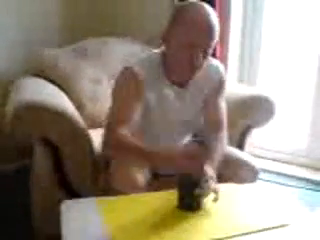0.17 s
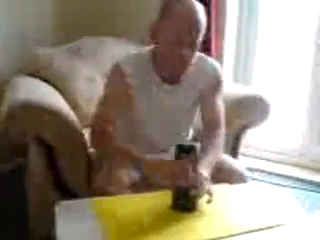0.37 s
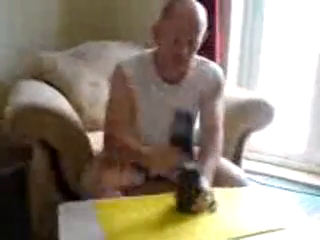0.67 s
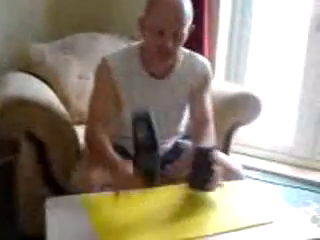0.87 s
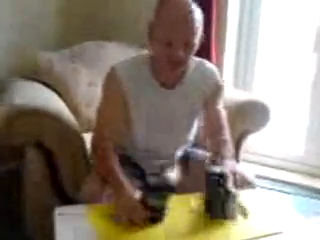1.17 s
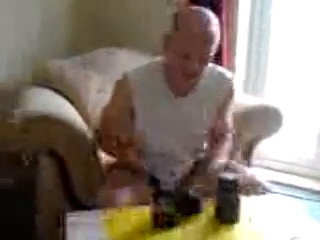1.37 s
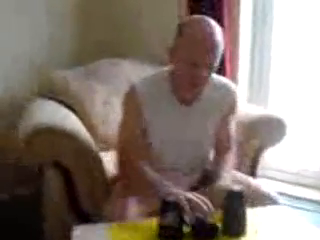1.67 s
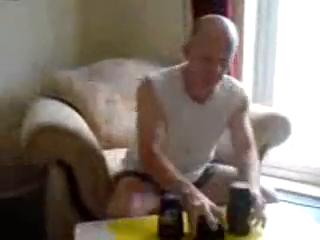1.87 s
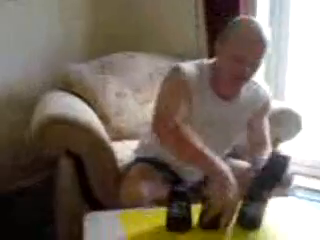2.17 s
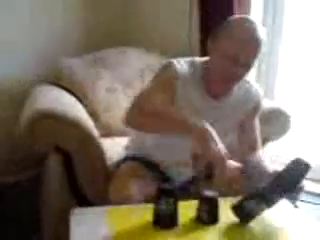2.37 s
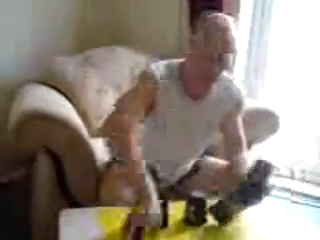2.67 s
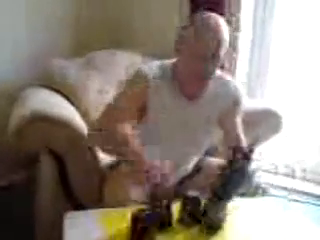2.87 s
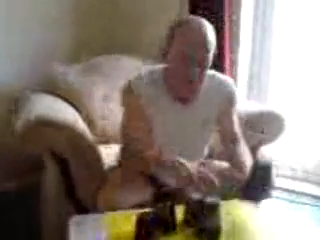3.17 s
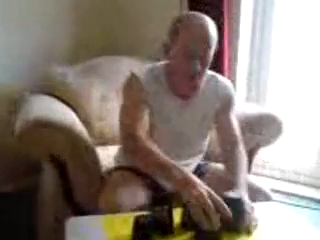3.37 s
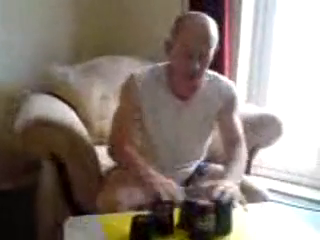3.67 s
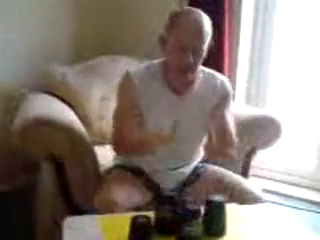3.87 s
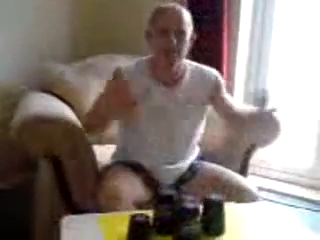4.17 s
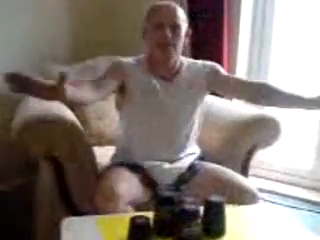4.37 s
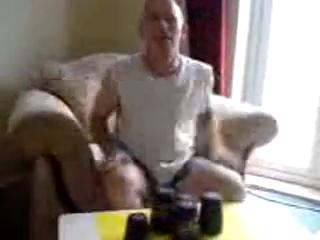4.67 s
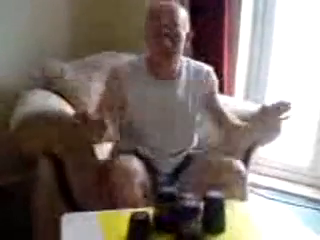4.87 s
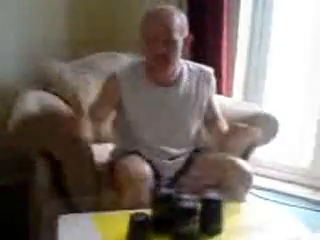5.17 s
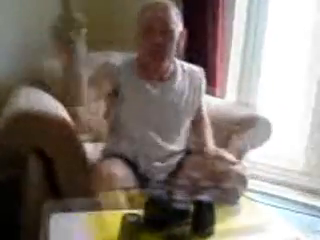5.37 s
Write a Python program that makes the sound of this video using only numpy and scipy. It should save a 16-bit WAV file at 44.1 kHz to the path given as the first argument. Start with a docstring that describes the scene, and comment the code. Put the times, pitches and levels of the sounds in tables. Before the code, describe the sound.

Rapid hollow plastic cup knocks and scrapes on a table in a soft living room, ending with two sharp slaps, muffled and overloaded.

```python
"""Light plastic cups are nested, pulled apart and set down on a low table in a soft living room.
Each knock is a short chatter of rims that rings the rims, the air in the cups and the cup walls.
Cups set down ring the table top, low thumps jolt it, and grainy noise slides between the knocks.
Hands slap twice near the end: bursts of noise coloured by the cupped palms.
Short echoes and a quiet room tone lie behind; a dull microphone overloads on the loudest peaks."""
import sys
import numpy as np
from scipy import signal
from scipy.io import wavfile
from scipy.ndimage import uniform_filter1d

SR = 44100
rng = np.random.default_rng(int(sys.argv[2]) if len(sys.argv) > 2 else 0)


def digitize_waveform(pressure):
    """Quantize a signal to 16-bit integers and store it at the path in sys.argv[1].

    Rows of a 2-D input are taken as channels; values are limited to [-1, 1].
    """
    field = np.atleast_2d(pressure).T
    bounded = np.clip(field, -1, 1)
    quanta = np.round(bounded * 32767).astype(np.int16)
    wavfile.write(sys.argv[1], SR, quanta)


def gain_from_db(level_db):
    """Turn a decibel level (scalar or array-like) into a linear amplitude factor."""
    decades = np.asarray(level_db, float) / 20
    return 10 ** decades


N = 242991  # length in samples

# Cups meeting. Each row: firm contact in seconds, relative level of the rim clack in dB,
# cup air in dB against the clack, cup wall in dB against the clack, brightest rim pitch in Hz,
# share of the energy in the first contact from 0 to 1.
CUP_KNOCKS = [(0.0486, -16.5, -30, -3, 1670, 0), (0.096, -15.5, 4.5, -7, 2910, 0.42),
              (0.144, -2, 1.5, -5, 1770, 0.14), (0.183, 1.5, -34.5, -1, 1620, 0.29),
              (0.2267, -28, -9, 14.5, 1620, 0.34), (0.4092, -10.5, -4.5, 0.5, 1505, 0),
              (0.4322, -11.5, -17, -1, 1360, 0.35), (0.6055, -8.5, 0.5, 1.5, 2600, 0),
              (0.7004, -19.5, 1.5, 4.5, 2130, 0.07), (0.728, -8.5, 11.5, 9, 1210, 0.26),
              (0.7547, -11.5, 7.5, -18.5, 1705, 0), (0.7991, -14.5, -7, -0.5, 2260, 0.27),
              (0.9416, -5.5, -3.5, -3, 2500, 0.6), (0.9748, -4.5, 7.5, -1, 1620, 0.39),
              (0.9934, -22, 10, -1.5, 1620, 0), (1.0953, -15.5, 0, -1, 2290, 0),
              (1.1239, -16.5, -7.5, -18.5, 2580, .05), (1.268, -19, -6.5, -18.5, 2860, 0.24),
              (1.5661, -24, -7, 16, 1730, .1), (1.592, 0, 3.5, -4.5, 1600, 0.32),
              (1.6864, 1.5, -3, -1.5, 1990, 0.11), (1.8769, 3.5, -6.5, -11.5, 1680, 0.06),
              (1.9186, -13, 4, 9, 1780, 0), (2.1185, -14, -8, -0.5, 1720, 1),
              (2.5133, -10.5, -4, -10, 2010, 0), (2.5333, -18, 15, 10.5, 1270, 0.04),
              (2.7311, -6.5, 5, 5, 1430, 0), (2.7508, -5, -2.5, 5, 1745, 0.7),
              (2.7783, -4.5, -14, -13.5, 1360, 0.4), (2.7975, -2, -8, -13.5, 2300, 0),
              (2.807, -5.5, 3.5, -9.5, 1720, 0.87), (2.958, -1, -8.5, -4, 2700, 0.17),
              (3.302, -1.5, -10.5, 5, 1740, 0.07), (3.467, -8, -4.5, -2.5, 2290, 0),
              (3.563, 0.5, -5, -8, 2210, 0.31), (3.6113, -11, 9, 2.5, 1840, 0.27),
              (3.857, -1.5, -3, 6, 2164, 0.13), (3.8982, -2, -5.5, -15, 2300, 0.44),
              (3.9934, -12, 11, 2, 1890, 0.29), (4.001, -5, -16.5, -9.5, 2220, 0.27),
              (4.031, -14.5, -1.5, -7, 1350, 0.14), (4.2813, -12, -0.5, -12, 1427, 0),
              (4.3033, -3, 8.5, -4, 2477, 0.3), (4.356, -12, 10, 5.5, 1606, .05),
              (4.381, -9.5, -17, -13.5, 1800, 0.37), (4.43, -7, -4, -1.5, 1780, 0)]
# Ringing tones of each part. Each row: usual pitch in Hz, relative level in dB,
# time to fade by 60 dB in seconds.
TABLE_TOP_MODES = [(117, -25, 0.033), (179.5, -2, 0.46), (225, 3, 0.057), (254.2, 1, 0.39),
                   (319.3, 2, 0.29)]
CUP_AIR_MODES = [(458, 0, .045), (515, -1, .035)]
CUP_WALL_MODES = [(653, 10, 0.0071), (799.6, 3.8, 0.05), (920.4, 5.3, 0.052), (1008, 7.2, 0.031)]
RIM_MODES = [(1266, 13, 0.0058), (1620, 4, 0.009), (1870, 1, 0.0076), (2300, 2.5, 0.0058),
             (2590, -0.5, 0.0094), (3136, -4.5, 0.03), (3850, -1, 0.018), (4260, 3, 0.0061)]
# Cups coming down on the table top. Each row: firm contact in seconds, relative level in dB.
CUP_LANDINGS = [(0.0431, -18.5), (0.1432, -12.5), (0.1818, -5), (0.411, -14.5), (0.6072, -14.5),
                (0.6476, -38), (0.6967, -13.5), (0.7528, -12.5), (0.8012, -10.5), (0.943, -14),
                (1.0965, -14), (1.1266, -20), (1.5917, -9), (1.6828, -9.5), (1.8754, -3.5), (2.5149, -14),
                (4.0323, -12.5), (4.2819, -8.5), (4.357, -27), (4.4302, -13)]
# The table legs jolt. Each row: start in seconds, relative level in dB, pitch in Hz.
TABLE_THUMPS = [(0.143, -15, 181), (0.727, -14.5, 177), (1.682, -24.5, 182), (2.514, -19, 167),
                (4.28, -18.5, 129.7), (5.199, -35.5, 104)]
# Bursts of the hand slaps. Each row: start in seconds, relative level in dB,
# pitch of the cupped air in Hz, fading time (to 1/e) in milliseconds.
HAND_SLAPS = [(4.567, 10, 1410, 7.5), (4.569, 1, 2550, 6.1), (5.199, 6.5, 2390, 8), (5.211, 5.5, 3060, 4.8)]
# Colour of a slap before the palm. Each row: frequency in Hz, level in dB per Hz.
SLAP_COLOUR = [(100, -21.5), (500, -7.5), (1200, -8), (2500, -2), (5000, 0)]
# Cups and hands sliding on the mat and in each other. Each row: middle in seconds, level in dB,
# nominal length in seconds, pitch of the hollow or wall that sounds in Hz.
SLIDE_STROKES = [(0.029, -39, 0.14, 485), (0.108, -22.5, 0.044, 2930), (0.324, -40.5, 0.25, 306),
                 (0.419, -37.5, 0.1, 1370), (0.68, -28.5, 0.15, 2990), (0.872, -32.5, 0.15, 288),
                 (0.95, -15, 0.027, 2900), (1.092, -39, 0.18, 2830), (1.118, -29.5, 0.11, 363),
                 (1.178, -29.5, 0.036, 3030), (1.345, -37, 0.22, 2530), (1.432, -42.5, 0.074, 584),
                 (1.481, -37.5, 0.065, 2900), (1.528, -39, 0.061, 900), (1.847, -24.5, 0.12, 427),
                 (2.038, -33, 0.2, 285), (2.09, -31.5, 0.063, 1670), (2.193, -28.5, 0.07, 2430),
                 (2.207, -38, 0.17, 356), (2.237, -33, 0.085, 2150), (2.341, -31, 0.031, 2100),
                 (2.483, -31.5, 0.13, 280), (2.501, -31, 0.08, 2090), (2.629, -32, 0.2, 3130),
                 (2.928, -35.5, 0.18, 2900), (3.131, -28.5, .045, 620), (3.26, -44.5, .04, 1700),
                 (3.852, -11.5, 0.018, 1425), (4.151, -28, 0.067, 1470), (4.156, -21, 0.096, 406),
                 (5.146, -28.5, 0.04, 1980), (5.19, -20.5, 0.017, 2130), (5.315, -47, 0.31, 375),
                 (5.486, -46, 0.1, 2480)]
# How fast the echoes die. Each row: frequency in Hz, time to fade by 60 dB in seconds.
ROOM_FADE = [(100, 0.5), (300, 0.21), (800, 0.32), (1450, 0.25), (2500, 0.24), (4500, 0.29)]
# Colour of the room tone. Each row: frequency in Hz, relative level in dB per Hz.
HUSH_COLOUR = [(24, -37), (40, -13.5), (252, -4), (424, -19.5), (560, -14), (3400, -20.5), (4420, -46)]
# Response of the microphone. Each row: frequency in Hz, gain in dB.
MIC_RESPONSE = [(40, -3), (100, 1), (2500, -1.5), (3200, -3.5), (3500, -7), (3800, -19.5), (4300, -25),
                (4800, -15.5), (5200, -73.5)]

RATTLE_MS, RATTLE_GROWTH = 12.8, 0.53  # fading time at 0 dB; hard blows rattle the nested cups longer
GRAZE_MS, GRAZE_SHRINK = 1.03, 0.36  # rise time at 0 dB; soft blows take longer to seat
LEAD_MS, LEAD_DB = 5.1, -14  # a faint noise swells up just before each blow; level against the blow
LANDING_FIRM = 0.13  # first contact's share of a landing's energy
FREE_DB, FREE_T60 = 4.5, 0.0091  # the rim between the fingers: relative level, 60 dB fade in seconds
SCRAPE_WIDTH_HZ, SCRAPE_WIDTH_SHARE = 110, 0.33  # a scrape's band widens with its pitch
ROOM_DB, HUSH_DB = 1, -55  # echoes against the near sound; middle level of the room tone
CEILING_DB, KNEE = -0.45, 45  # overload level; a higher knee bends more sharply
SMEAR_DB, SMEAR_T60 = -6, 0.075  # treble noise after clipped peaks: level, 60 dB fade in seconds
EDGE_HZ = 10300  # upper band limit


def evened(x):
    """Scales a sound to an average (rms) level of 1."""
    return x / np.sqrt(np.mean(x ** 2) + 1e-20)


def read(points, hz):
    """Reads a table between its rows on a log-frequency axis."""
    f, value = np.transpose(points)
    return np.interp(np.log(hz + 1), np.log(f + 1), value)


def add(mix, s, sound):
    """Mixes a sound in at s seconds."""
    part = mix[round(s * SR):][:len(sound)]
    part += sound[:len(part)]


def coloured(x, points):
    """Filters by a table of Hz and dB, without sounding ahead of the input (minimum phase)."""
    hz = abs(np.fft.fftfreq(8192, 1 / SR))
    log_gain = np.log(gain_from_db(read(points, hz)))
    response = np.exp(np.conj(signal.hilbert(log_gain)))
    taps = np.fft.ifft(response).real[:2048]
    return signal.oaconvolve(x, taps)[:len(x)]


def resonate(x, hz, width):
    """One resonance with a gain of about 1 at its pitch; a wider one dies faster."""
    r = np.exp(-np.pi * width / SR)
    turn = np.exp(2j * np.pi * hz / SR)
    return 2 * signal.lfilter([1 - r], [1, -r * turn], x).real


def ring(modes, chance, spread_db, detune):
    """A part's response to one blow; where it lands shifts each mode's strength and pitch."""
    t = np.arange(SR // 4) / SR
    out = np.zeros(len(t))
    for (hz, db, t60), (strength, pitch) in zip(modes, chance):
        fade = gain_from_db(db + spread_db * strength - 60 * t / t60)
        out += fade * np.sin(2 * np.pi * hz * (1 + detune * pitch) * t)
    # little radiates below the lowest mode
    out = signal.lfilter(*signal.butter(2, 0.47 * modes[0][0], "high", fs=SR), out)
    return out / np.linalg.norm(out)


def chatter(noise, ms, rise_ms, grain_db):
    """A rising and dying flurry of uneven contacts, with a total energy of 1."""
    t_ms = np.arange(len(noise)) / SR * 1000
    # contacts bunch into bounces
    clumps = gain_from_db(3.6 * evened(uniform_filter1d(noise[::-1], 160)))
    shape = clumps * np.exp(-t_ms / max(ms, 0.5)) * np.minimum(t_ms / rise_ms, 1) ** 2
    contacts = np.sign(noise) * gain_from_db(grain_db * noise ** 2) * shape
    return contacts / np.linalg.norm(contacts)


def blow(db, firm):
    """A faint noise swells, a firm contact takes a share of the energy, a rattle the rest; gives lead too."""
    lead_noise, rattle = np.clip(rng.standard_normal((2, 4096)), -3.2, 3.2)
    firm = np.clip(firm, 0, 1)
    lead = round(LEAD_MS * SR / 1000)  # samples ahead of the firm contact
    rattle_ms = RATTLE_MS * gain_from_db(RATTLE_GROWTH * db)
    rise_ms = GRAZE_MS * gain_from_db(-GRAZE_SHRINK * db)
    drive = np.sqrt(1 - firm) * chatter(rattle, rattle_ms, rise_ms, grain_db=0.85)
    drive[0] += np.sqrt(firm)
    swell = gain_from_db(LEAD_DB) * lead_noise[:lead] * np.linspace(0, 1, lead) / np.sqrt(lead)
    return lead / SR, gain_from_db(db + 18.0) * np.concatenate([swell, drive])


def knocks():
    """Rims chatter into the three ringing parts of the cups: rims, enclosed air and walls."""
    out = np.zeros(N)
    for s, db, air_db, wall_db, bright_hz, firm in CUP_KNOCKS:
        lead, drive = blow(db, firm)
        # the grip leaves the rim modes near one pitch most free: 13 dB lost per octave away
        rim = [(hz, level_db - 13 * abs(np.log2(hz / bright_hz)), t60)
               for hz, level_db, t60 in RIM_MODES]
        # the stretch of rim between the fingers rings at the brightest pitch
        rim.append((bright_hz, FREE_DB, FREE_T60))
        body = np.zeros(SR // 4)
        for modes, level_db in ((rim, 0), (CUP_AIR_MODES, air_db), (CUP_WALL_MODES, wall_db)):
            chance = rng.standard_normal((len(modes), 2))
            body += gain_from_db(level_db) * ring(modes, chance, spread_db=2.5, detune=0.031)
        add(out, s - lead, signal.fftconvolve(drive, body))
    return out


def landings():
    """The table top rings under each cup set down, driven by the contacts of the blow."""
    out = np.zeros(N)
    for s, db in CUP_LANDINGS:
        lead, drive = blow(db, LANDING_FIRM)
        chance = rng.standard_normal((len(TABLE_TOP_MODES), 2))
        top = ring(TABLE_TOP_MODES, chance, spread_db=1.0, detune=0.0063)
        add(out, s - lead, signal.fftconvolve(drive, top))
    return out


def thumps():
    """The whole table swings at one low pitch, rising over 2.4 ms and fading 60 dB in 50 ms."""
    out = np.zeros(N)
    t = np.arange(SR // 4) / SR
    for s, db, hz in TABLE_THUMPS:
        fade = gain_from_db(db + 9.5 - 60 * t / 0.05)
        add(out, s, fade * np.sin(2 * np.pi * hz * t) * np.minimum(t / 0.0024, 1))
    return out


def slides():
    """Grainy friction swells and fades, sounding one hollow or wall."""
    out = np.zeros(N)
    for s, db, length, hz in SLIDE_STROKES:
        grip, friction = rng.standard_normal((2, SR // 2))
        grip = evened(uniform_filter1d(grip, 300))  # the contact catches and lets go
        # a few ridges snap past
        ticks = friction * gain_from_db(5.76 * grip + 1.5 * np.minimum(friction ** 2, 9))
        width = SCRAPE_WIDTH_HZ + SCRAPE_WIDTH_SHARE * hz
        sound = evened(resonate(resonate(ticks, hz, width), hz, 2 * width))
        swell = np.hanning(round(1.34 * length * SR))
        stroke = gain_from_db(db) * sound[:len(swell)] * swell
        start = round((s - 0.68 * length) * SR)
        # a stroke that begins before time zero loses its beginning
        add(out, max(start, 0) / SR, stroke[max(-start, 0):])
    return out


def slaps():
    """Bursts of squeezed air, coloured by the resonance of the cupped palm."""
    out = np.zeros(N)
    for s, db, hz, ms in HAND_SLAPS:
        noise = np.clip(rng.standard_normal(4096), -3, 3)
        burst = coloured(chatter(noise, ms, rise_ms=ms / 6, grain_db=1.0), SLAP_COLOUR)
        burst = burst + 2.95 * resonate(burst, hz, 600)
        add(out, s, gain_from_db(db + 20.0) * burst / np.linalg.norm(burst))
    return out


def room(x):
    """Sparse echoes of random sign, each band dying at its own speed, over three alternating paths."""
    out = np.zeros(N)
    slots = np.arange(160, SR // 2 - 20, 20)
    for k in range(3):
        taps = np.zeros(SR // 2)
        taps[slots + rng.integers(0, 20, len(slots))] = rng.choice([-1., 1.], len(slots))
        hz, t, bands = signal.stft(taps, SR, nperseg=256)
        fade = gain_from_db(-60 * t / read(ROOM_FADE, hz)[:, None])
        tail = signal.istft(bands * fade, SR, nperseg=256)[1]
        # the paths take turns at a steady 13 Hz, which blurs steady tones in the tail
        share = np.sqrt(2 / 3) * np.cos(2 * np.pi * (13 * np.arange(N) / SR + k / 3))
        out += signal.fftconvolve(x * share, tail / np.linalg.norm(tail))[:N]
    return out


def hush():
    """Quiet room tone: coloured noise whose level wavers."""
    waver = evened(uniform_filter1d(rng.standard_normal(N), 1200))
    tone = evened(coloured(rng.standard_normal(N), HUSH_COLOUR))
    return gain_from_db(HUSH_DB + 3.2 * waver) * tone


def scene():
    """Cups, table and hands with their echoes, plus the room tone."""
    near = knocks() + landings() + thumps() + slides() + slaps()
    return (near + gain_from_db(ROOM_DB) * room(near) + hush())[None]


def low_pass(x):
    """Removes everything above the highest recorded frequency."""
    return signal.sosfilt(signal.butter(12, 16000, fs=SR, output="sos"), x)


def record(dry):
    """A dull microphone overloads on the loudest peaks; a short smear of treble noise trails after the loudest
    peaks; the band is limited."""
    x = coloured(dry[0], MIC_RESPONSE) / gain_from_db(CEILING_DB)
    clipped = x / (1 + abs(x) ** KNEE) ** (1 / KNEE)
    # the treble of what the clipping changed
    highpass = signal.butter(6, 4500, "high", fs=SR, output="sos")
    clip_treble = signal.sosfilt(highpass, clipped - x)
    t = np.arange(SR // 8) / SR
    smear = rng.standard_normal(len(t)) * gain_from_db(-60 * t / SMEAR_T60)
    smear = smear / np.linalg.norm(smear)
    smeared = clipped + gain_from_db(SMEAR_DB) * signal.oaconvolve(clip_treble, smear)[:N]
    edge = signal.firwin(101, EDGE_HZ, window=("kaiser", 1.2), fs=SR)
    limited = gain_from_db(CEILING_DB) * signal.oaconvolve(smeared, edge, "same")
    return low_pass(limited[None])


dry = scene()
out = record(dry)
digitize_waveform(out)
```